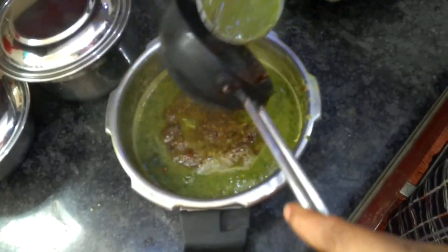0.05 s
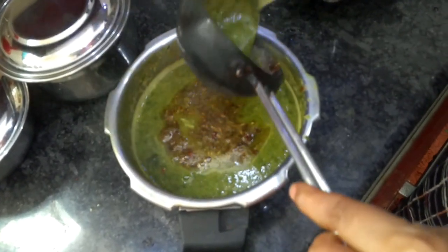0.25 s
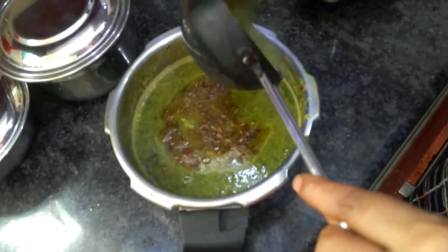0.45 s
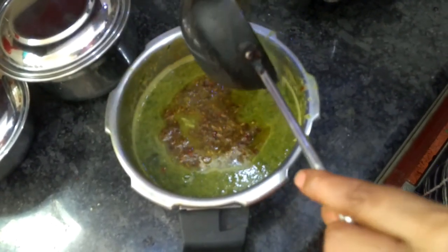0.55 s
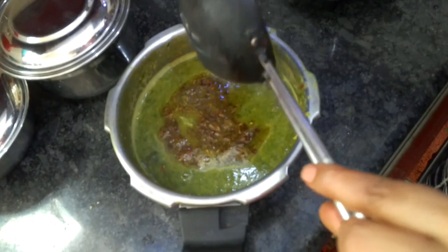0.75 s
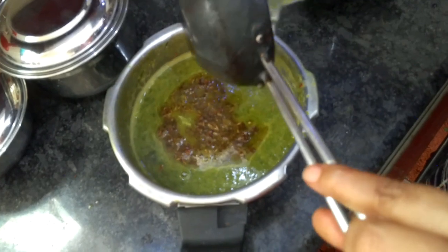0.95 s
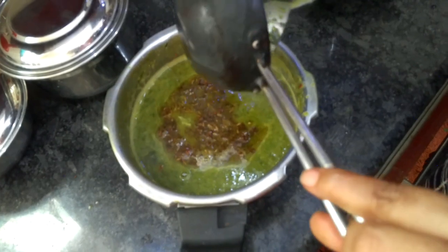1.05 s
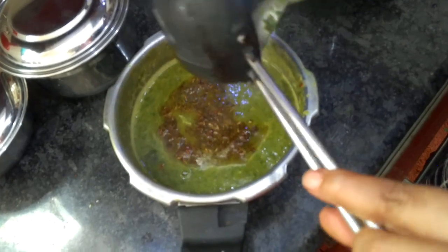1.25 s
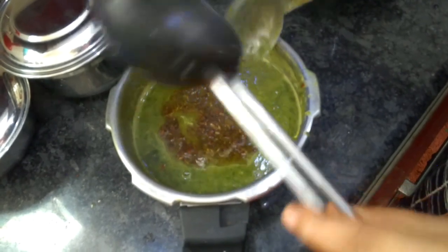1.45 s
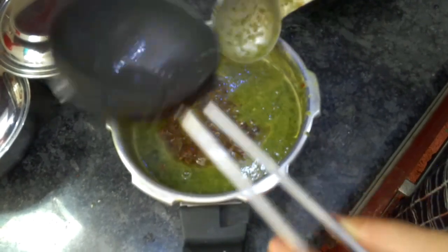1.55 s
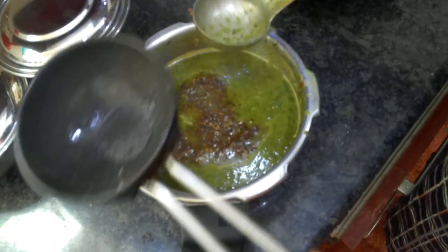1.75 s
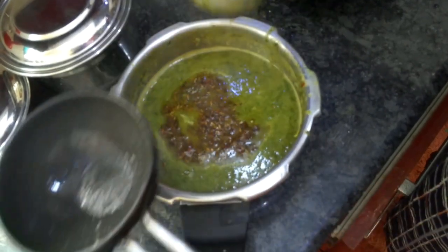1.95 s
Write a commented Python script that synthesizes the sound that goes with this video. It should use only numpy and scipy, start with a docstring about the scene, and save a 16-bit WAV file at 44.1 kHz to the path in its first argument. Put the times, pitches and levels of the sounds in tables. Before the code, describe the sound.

Hot oil sizzles as it meets wet lentils in a small pan. After a few faint ticks, the hiss swells from about 0.2 seconds and is loudest from 0.3 to 0.8 seconds, with bubbling, spurts of steam and sharp spits. From about 1 second it thins to a soft crackle with scattered pops until 2 seconds. A faint kitchen hum lies underneath.

```python
"""A small kitchen hums. A spoonful of wet lentils meets hot oil in a tempering pan over a pressure cooker.
Spices tick, the first drops spit and steam jets off the hot metal. Water flashes to steam in thousands
of tiny bursts, and bubbles boil up in the hollow of the pan, froth and settle to a simmer, while the
cooker rings faintly. The sizzle thins to a crackle as the pan cools and is moved away."""
import sys
import numpy as np
from scipy import signal
from scipy.fft import rfft, irfft
from scipy.io import wavfile

SR = 44100
rng = np.random.default_rng(int(sys.argv[2]) if len(sys.argv) > 2 else 0)


def persist_wave(psi):
    """Save psi, clipped to +-1, as 16-bit WAV."""
    counts = np.round(np.clip(psi, -1, 1) * 32767).astype(np.int16)
    wavfile.write(sys.argv[1], SR, np.atleast_2d(counts).T)


N = 88200


def amp(db):
    """Decibels to gain."""
    return 10 ** (np.asarray(db) / 20)


def unit(x):
    """Scale to an rms of 1."""
    return x / np.sqrt(np.mean(x ** 2) + 1e-18)


def curve(rows):
    """Join (s, value) points by straight lines."""
    return np.interp(np.arange(N) / SR, *np.array(rows).T)


def wander(rate_hz):
    """Random points joined by straight lines, rms 1."""
    points = rng.standard_normal(N // 10)
    return unit(np.interp(np.arange(N) / SR * rate_hz, np.arange(len(points)), points))


def colour(x, spectrum, size=2048):
    """Minimum-phase filter of unit power gain, shaped by (Hz, dB) points."""
    hz, db = np.array(spectrum).T
    bins_hz = np.arange(size // 2 + 1) * SR / size
    gain = amp(np.interp(np.log(bins_hz + 1), np.log(hz), db))
    cepstrum = irfft(np.log(unit(gain)))
    cepstrum[1:size // 2] *= 2
    cepstrum[size // 2 + 1:] = 0
    return signal.fftconvolve(x, irfft(np.exp(rfft(cepstrum))))[:N]


def band(x, hz, width_hz):
    """A single resonance."""
    return signal.lfilter(*signal.iirpeak(hz, hz / width_hz, fs=SR), x)


def impulses(per_s, spread_db):
    """Random impulses of uneven size, mean power 1."""
    chance = np.clip(per_s / SR, 1 / SR, 1)
    size = amp(spread_db * np.minimum(rng.standard_normal(N), 1.18))
    return (rng.random(N) < chance) * rng.choice([-1, 1], N) * unit(size) / np.sqrt(chance)


def reverb(x, t60_s):
    """Convolve with a diffuse decay of unit energy."""
    t = np.arange(N // 2) / SR
    tail = rng.standard_normal(len(t)) * np.exp(-np.log(1000) * t / t60_s)
    return signal.fftconvolve(x, tail / np.linalg.norm(tail))[:N]


# Room rumble. Each row: frequency in Hz, relative density in dB.
RUMBLE_SPECTRUM = [(15, -62.5), (28, -63), (45, -57.5), (62, -70.5), (120, -75), (190, -75.5), (260, -71),
                   (350, -76), (600, -75), (1000, -80.5), (1600, -102.5), (4000, -95.5), (15000, -106)]
# Hum tones. Each row: frequency in Hz, level in dB.
HUM_TONES = [(48, -53), (256, -55.5)]


def kitchen():
    """Low room rumble and a wavering hum."""
    t = np.arange(N) / SR
    out = amp(-43) * unit(colour(rng.standard_normal(N), RUMBLE_SPECTRUM, size=8192))
    for hz, db in HUM_TONES:
        tone = np.sin(2 * np.pi * hz * t + 0.7 * wander(7.37))
        out += amp(db) * unit(tone * (1 + 0.41 * wander(8.5)))
    return out


# Spice crackle. Each row: time in seconds, level in dB.
CRACKLE_LEVELS = [(0, -51.5), (.15, -51), (.4, -35), (.9, -47), (1.3, -57), (1.6, -49), (2.0, -52)]
# Each row: frequency in Hz, relative gain in dB.
CRACKLE_SPECTRUM = [(500, -16), (1900, -10), (2350, 1), (3200, -26), (4300, -6), (5600, -5), (6150, 3),
                    (6800, -2), (7400, 1), (8200, -2), (8900, -11), (9900, -2), (10700, -10), (15000, -10)]


def crackle():
    """Spices tick in the oil, each tick smeared by the pan's walls."""
    ticks = impulses(per_s=500, spread_db=4) * amp(curve(CRACKLE_LEVELS))
    return colour(ticks + 0.4 * reverb(ticks, t60_s=0.036), CRACKLE_SPECTRUM)


# Bursting drops. Each row: start in seconds, peak in dB, centre in Hz, width in Hz.
DROP_POPS = [(0.022, -34, 6450, 3000), (.102, -23, 6700, 3430), (.124, -36, 10000, 9200),
             (0.211, -22, 9900, 3000), (.307, -9, 7060, 3960), (0.741, -9, 8100, 3000),
             (0.7562, -5.5, 9000, 3000), (1.090, -24, 8000, 8000), (1.221, -24, 8000, 6000),
             (1.25, -19.5, 8600, 6000), (1.26, -21, 9000, 6000), (1.267, -14.5, 10100, 8000),
             (1.322, -16, 6900, 12200), (1.376, -24, 7500, 8000), (1.46, -30.5, 7000, 7000),
             (1.494, -24, 3470, 5000), (1.549, -25, 6950, 6000), (1.591, -23, 6640, 4970),
             (1.63, -26, 7450, 5000), (1.663, -32, 7000, 6000), (1.689, -34, 7960, 8000),
             (1.819, -20, 6500, 14000), (1.946, -21.5, 5900, 4000)]


def drops(crack_s=0.0005, spray_s=0.0074, spray_db=-19):
    """Each drop cracks and leaves a few milliseconds of spray."""
    t = np.arange(N // 40) / SR
    envelope = np.exp(-t / crack_s) + amp(spray_db) * np.exp(-t / spray_s)
    highpass = signal.butter(2, 1900, "high", fs=SR, output="sos")
    out = np.zeros(N + len(t))
    for start_s, db, hz, width_hz in DROP_POPS:
        pop = signal.sosfilt(highpass, band(rng.standard_normal(len(t)) * envelope, hz, width_hz))
        start = int(start_s * SR)
        out[start:start + len(t)] += amp(db) * pop / np.abs(pop).max()
    return out[:N]


# Steam jets. Each row: start in seconds, level in dB, rise and hold in seconds, fall in dB per second,
# centre in Hz, half-width of each filter stage in Hz.
STEAM_JETS = [(0.136, -46, 0.013, 0.033, 196, 9800, 2520), (0.15, -49, 0.0091, 0.14, 148, 6000, 500),
              (0.203, -34.5, 0.007, 0.021, 220, 9900, 1500), (0.234, -28.5, 0.016, 0.013, 134, 2600, 420),
              (0.295, -26, 0.0041, 0.008, 250, 6300, 700), (.325, -30, 0.011, 0.08, 176, 2720, 300),
              (0.565, -24.5, 0.0062, 0.0079, 260, 2450, 895), (0.59, -25.5, .008, 0.0093, 302, 3750, 700),
              (0.743, -23, 0.0017, 0.045, 132, 8100, 2160), (1.326, -46.5, .002, 0.0069, 258, 1770, 1300),
              (1.367, -43, 0.017, 0.016, 155, 1770, 1000)]


def jets():
    """Freshly wetted hot metal shoots steam that whistles around its own pitch, holds and dies."""
    out = np.zeros(N)
    for start_s, db, rise_s, hold_s, fall_db_per_s, hz, half_width_hz in STEAM_JETS:
        hiss = band(rng.standard_normal(N), hz, 2 * half_width_hz)
        hiss = unit(band(hiss, hz, 2 * half_width_hz))
        age_s = np.arange(N) / SR - start_s
        attack = np.clip(age_s / rise_s, 0, 1)
        fall_db = fall_db_per_s * np.maximum(age_s - rise_s - hold_s, 0)
        out += hiss * attack * amp(db - fall_db + 0.87 * wander(300))
    return out


# Fizz of the oil. Each row: time in seconds, level in dB.
FIZZ_LEVELS = [(0, -65), (.135, -73), (.165, -38.5), (.195, -41.5), (.225, -28.5), (.275, -27.5),
               (.35, -19), (.45, -19.5), (.62, -19), (.72, -22), (.84, -23), (1.0, -30), (1.20, -35.5),
               (1.28, -34.5), (1.5, -41.5), (1.68, -41.5), (1.78, -44.5), (2.0, -41.5)]
# Each row: frequency in Hz, relative gain in dB.
FIZZ_SPECTRUM = [(200, -27.5), (450, -12.5), (650, -17.5), (850, -22), (1150, -12.5), (1500, -12.5),
                 (2400, -9), (3400, -6.5), (4500, -1), (5300, -5.5), (6150, 1), (6700, -3), (7450, 2.7),
                 (8200, 2.3), (8900, -2.5), (9800, 1), (11100, -5.5), (12100, -3.5), (14500, -5.5)]


def fizz(peak_per_s=22000, log_rate_per_db=0.1274):
    """Tiny steam bursts come in flurries and grow sparser as the oil cools."""
    db = curve(FIZZ_LEVELS)
    per_s = peak_per_s * np.exp(log_rate_per_db * (db - db.max()))
    bursts = impulses(per_s, spread_db=6.5)
    flurry_db = 0.23 * wander(44.07) + 0.65 * wander(400)
    return colour(bursts * amp(db + flurry_db), FIZZ_SPECTRUM)


def bubbles(levels, spectrum, per_s, ring_s, flurry_db, sizes=24):
    """Bubbles of many sizes, each ringing briefly at its own pitch."""
    t = np.arange(N // 40) / SR
    out = np.zeros(N)
    for hz in np.linspace(300, 5500, sizes):
        ring = np.sin(2 * np.pi * hz * t) * np.exp(-t / ring_s)
        out += signal.oaconvolve(impulses(per_s / sizes, spread_db=1.5), ring)[:N]
    return unit(colour(out, spectrum)) * amp(curve(levels) + flurry_db * wander(50.3))


# Boiling. Each row: time in seconds, level in dB.
BOIL_LEVELS = [(0, -61), (.15, -57.5), (.19, -43), (.24, -46), (.28, -28), (.33, -23), (.41, -24.5),
               (.53, -28.5), (.60, -29.5), (.69, -41), (.8, -51), (1.2, -66), (2.0, -54)]
# Each row: frequency in Hz, relative gain in dB.
BOIL_SPECTRUM = [(150, -55), (400, -23), (650, -23.5), (830, -5.5), (1150, -10), (1450, 2), (1720, 0.5),
                 (1950, -1.5), (2300, -2.5), (2750, 6), (3150, -14.5), (3600, -11), (8000, -7),
                 (15000, -37)]


def boil():
    """Steam boils up in the hollow of the pan."""
    return bubbles(BOIL_LEVELS, BOIL_SPECTRUM, per_s=5300, ring_s=0.0011, flurry_db=0.5)


# Froth. Each row: time in seconds, level in dB.
FROTH_LEVELS = [(0, -70), (.22, -49), (.33, -44), (.39, -25), (.52, -27), (.575, -40), (.64, -27.5),
                (.7, -37), (1.0, -42), (1.3, -72), (2.0, -60)]
# Each row: frequency in Hz, relative gain in dB.
FROTH_SPECTRUM = [(2000, -49), (3400, -9), (3950, 8.5), (4600, 9), (5200, -12), (9000, -34)]


def froth():
    """Small bubbles ring brightly at the height of the boil."""
    return bubbles(FROTH_LEVELS, FROTH_SPECTRUM, per_s=5000, ring_s=0.0012, flurry_db=0.5)


# Simmering. Each row: time in seconds, level in dB.
SIMMER_LEVELS = [(0, -59), (.25, -51), (.4, -30), (.7, -32), (.87, -32), (1.03, -35), (1.2, -43),
                 (1.39, -45.5), (1.56, -51), (2.0, -59)]
# Each row: frequency in Hz, relative gain in dB.
SIMMER_SPECTRUM = [(150, -29), (400, -9.5), (650, -9.5), (900, -4.5), (1150, -11.5), (1480, 4),
                   (1900, -2.5), (2300, -1.5), (2750, 0), (3300, -2.5), (4300, -18.5), (6000, 8),
                   (15000, -69)]


def simmer():
    """The wet lentils bubble on more softly."""
    return bubbles(SIMMER_LEVELS, SIMMER_SPECTRUM, per_s=4000, ring_s=0.0021, flurry_db=0.1)


# Steel resonances. Each row: frequency in Hz, relative gain in dB.
COOKER_MODES = [(1054, 6.5), (1490, 3), (1687, -12), (1747, -10), (2321, -8), (2546, 1), (2786, -6),
                (3998, 5), (4578, -7)]


def cooker(pan, t60_s=0.23, gain_db=-1):
    """The steel cooker rings in sympathy with the pan."""
    t = np.arange(N // 4) / SR
    decay_per_s = np.log(1000) / t60_s
    modes = sum(amp(db) * np.sin(2 * np.pi * hz * t) for hz, db in COOKER_MODES)
    ring = modes * np.exp(-decay_per_s * t) * 2 * decay_per_s / SR
    return amp(gain_db) * signal.fftconvolve(pan, ring)[:N]


def wall_echo(pan, gain_db=-8, cutoff_hz=4530):
    """The kitchen walls return a short, duller echo."""
    echo = amp(gain_db) * reverb(pan, t60_s=0.12)
    return signal.lfilter(*signal.butter(1, cutoff_hz, fs=SR), echo)


def scene():
    """The sizzling pan over the cooker in a humming kitchen, mono."""
    pan = crackle() + drops() + jets() + fizz() + boil() + froth() + simmer()
    return (kitchen() + pan + cooker(pan) + wall_echo(pan))[None]


def record(dry, rolloff_hz=15200, top_hz=15650):
    """Roll off the highest treble, then cut the top steeply."""
    soft = signal.sosfilt(signal.butter(6, rolloff_hz, fs=SR, output="sos"), dry)
    return signal.sosfilt(signal.ellip(10, 0.2, 80, top_hz, fs=SR, output="sos"), soft)


dry = scene()
out = record(dry)
persist_wave(out)
```